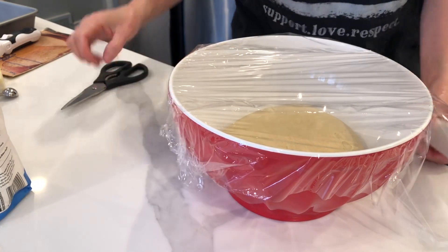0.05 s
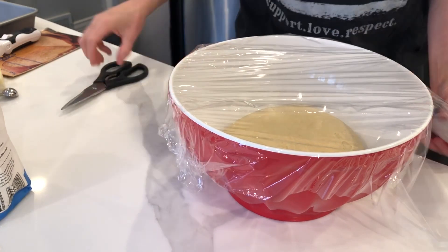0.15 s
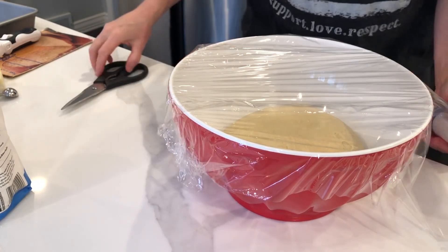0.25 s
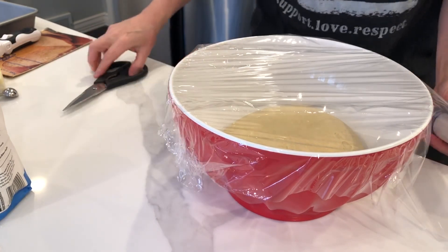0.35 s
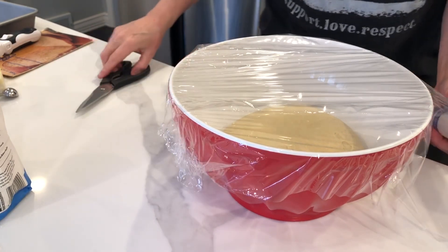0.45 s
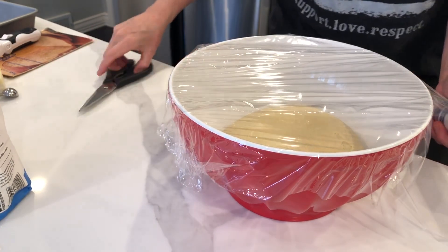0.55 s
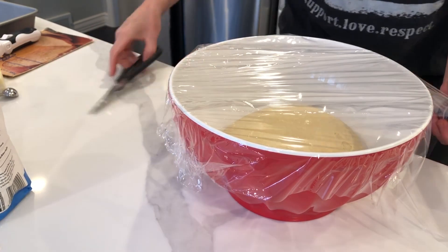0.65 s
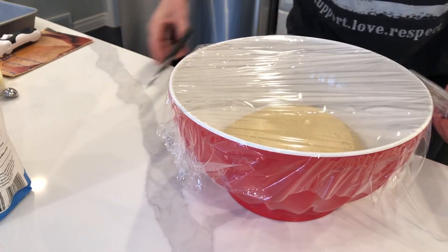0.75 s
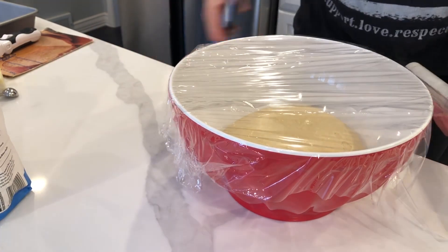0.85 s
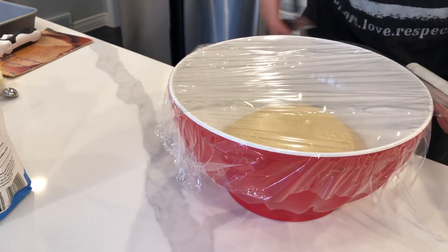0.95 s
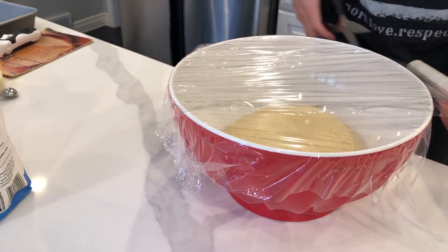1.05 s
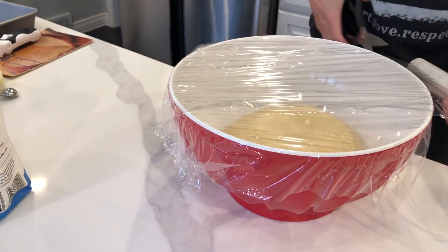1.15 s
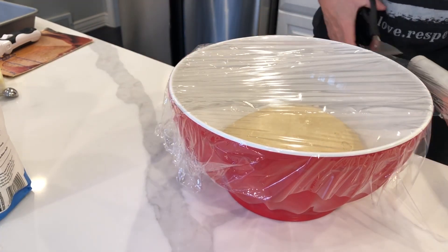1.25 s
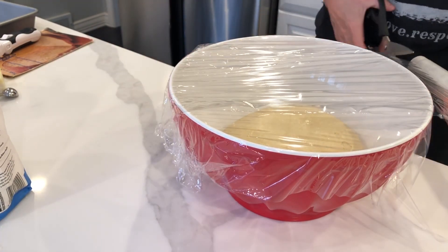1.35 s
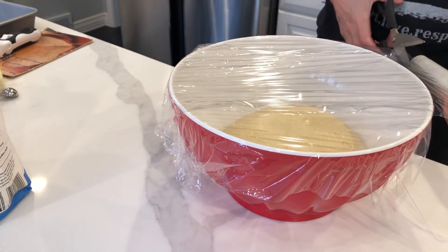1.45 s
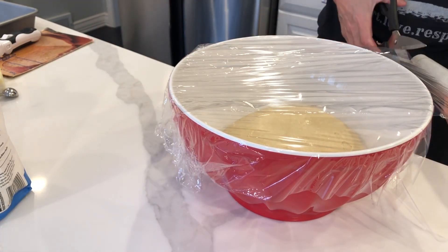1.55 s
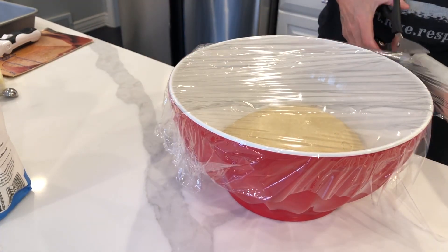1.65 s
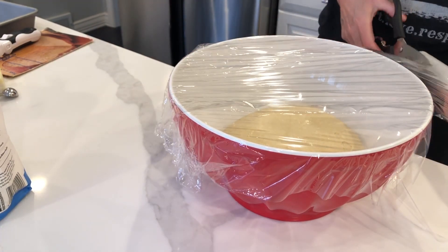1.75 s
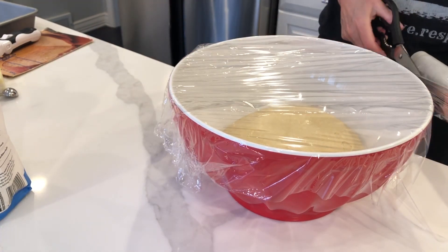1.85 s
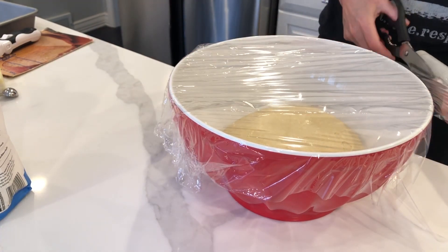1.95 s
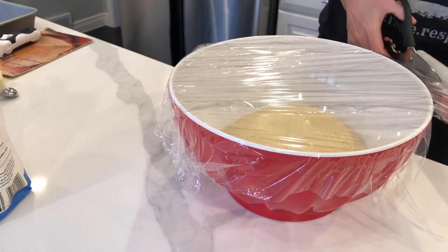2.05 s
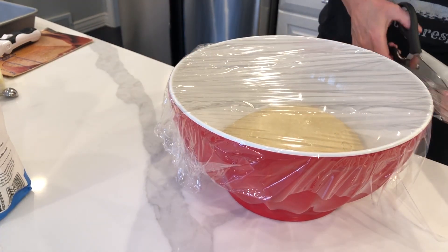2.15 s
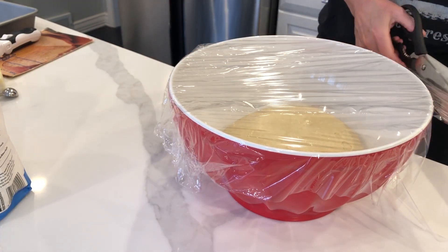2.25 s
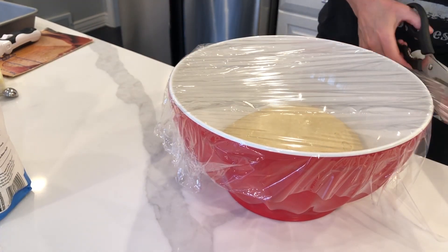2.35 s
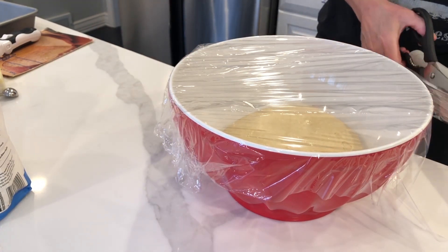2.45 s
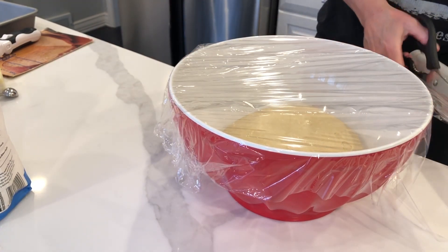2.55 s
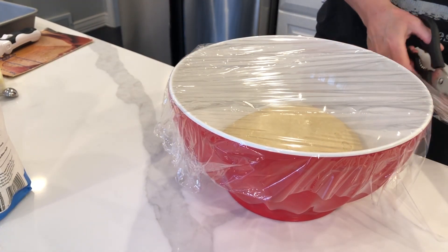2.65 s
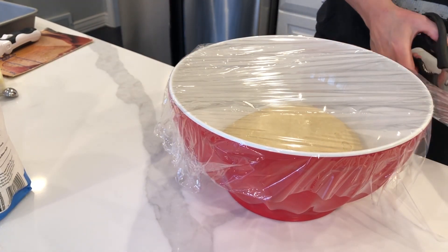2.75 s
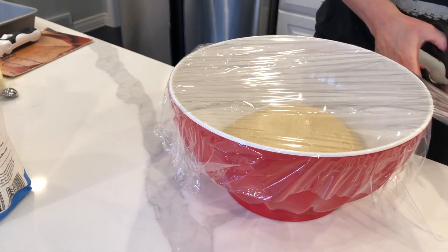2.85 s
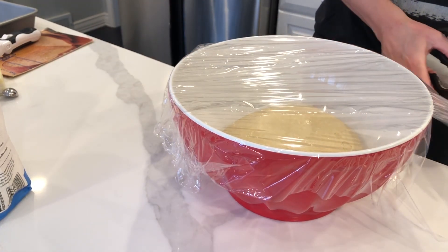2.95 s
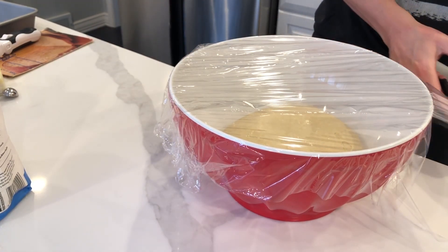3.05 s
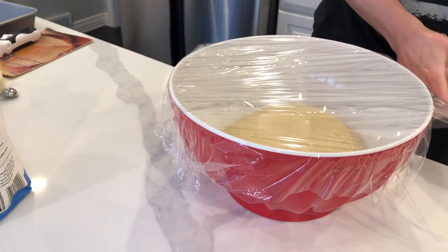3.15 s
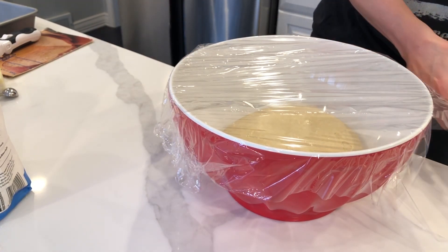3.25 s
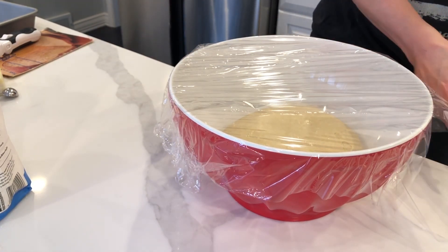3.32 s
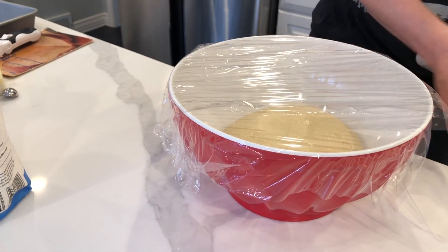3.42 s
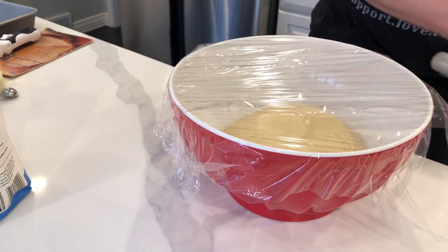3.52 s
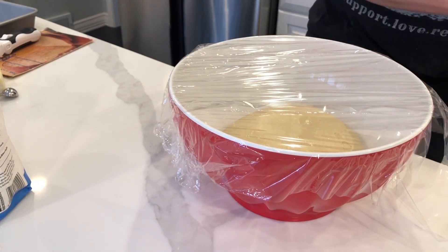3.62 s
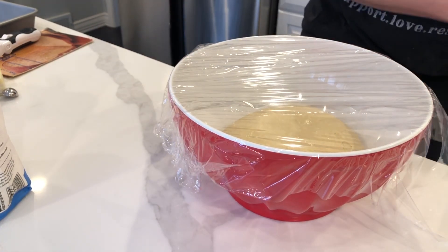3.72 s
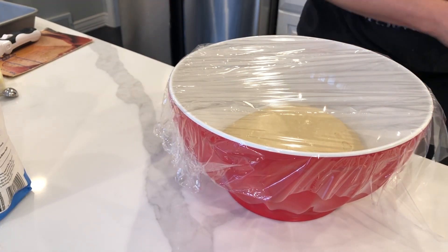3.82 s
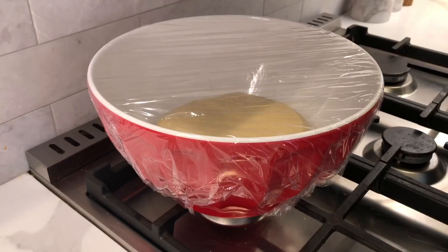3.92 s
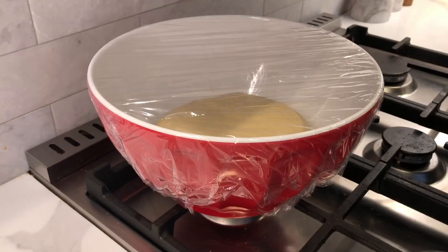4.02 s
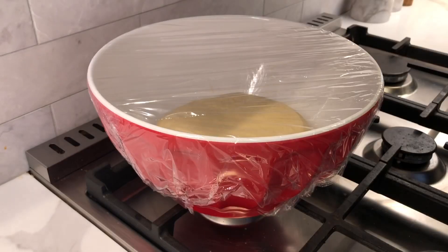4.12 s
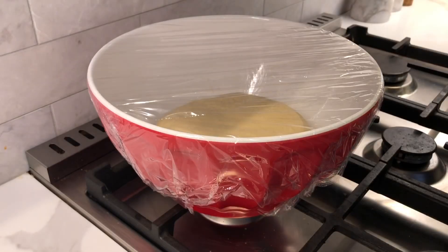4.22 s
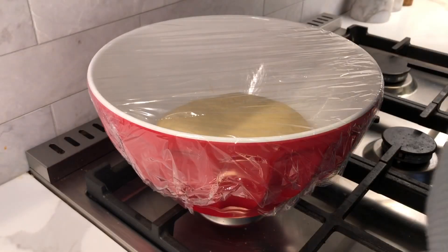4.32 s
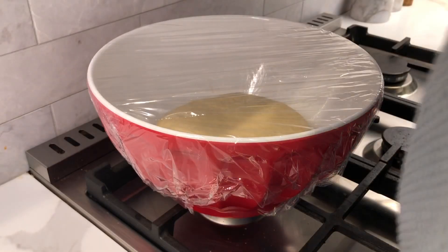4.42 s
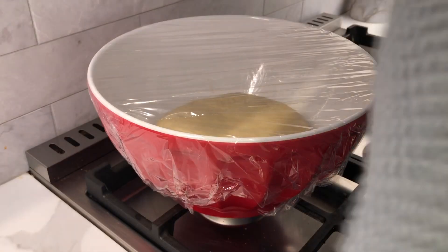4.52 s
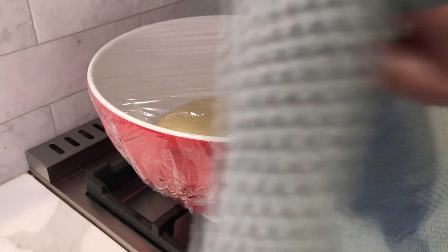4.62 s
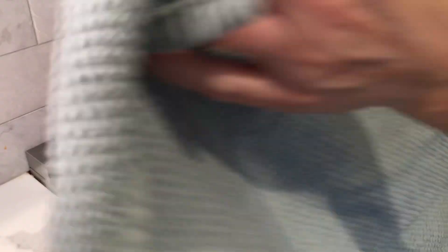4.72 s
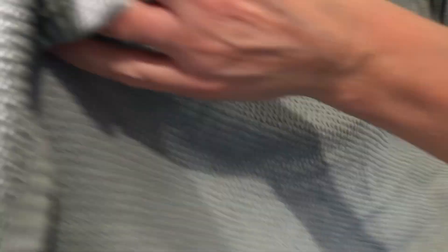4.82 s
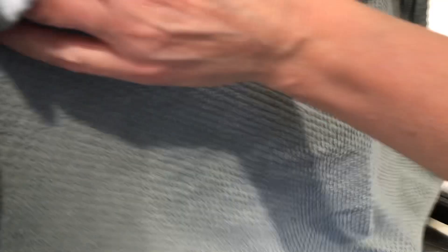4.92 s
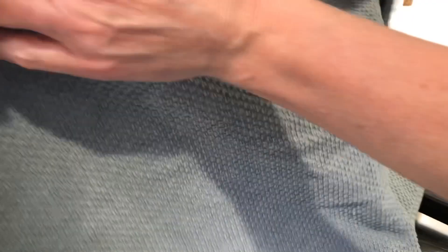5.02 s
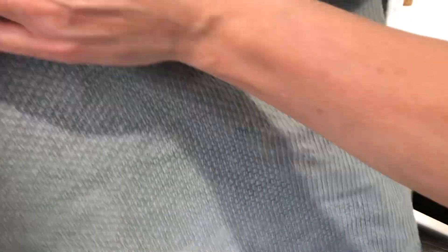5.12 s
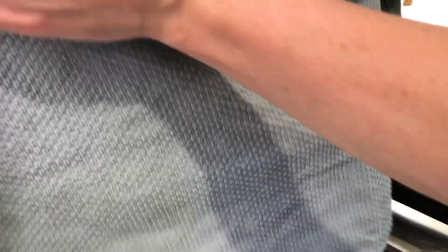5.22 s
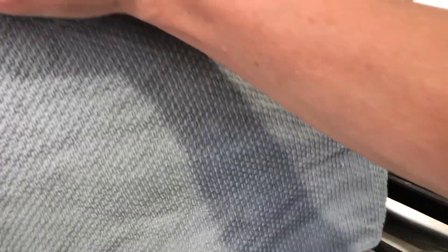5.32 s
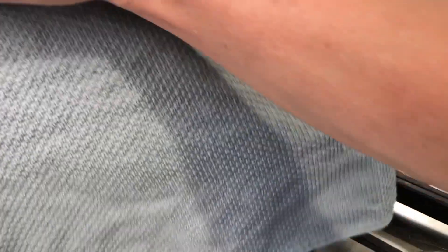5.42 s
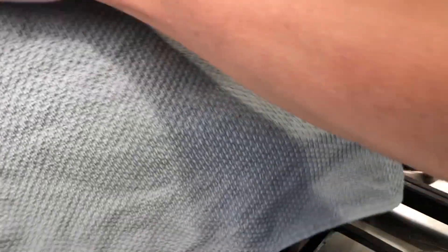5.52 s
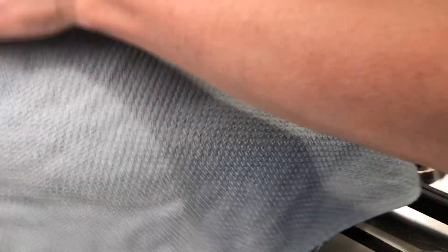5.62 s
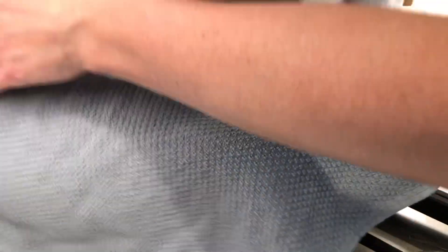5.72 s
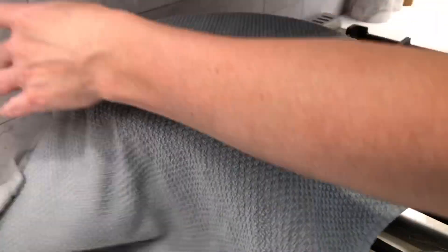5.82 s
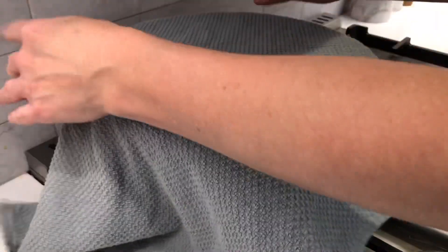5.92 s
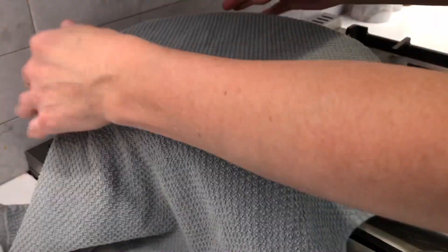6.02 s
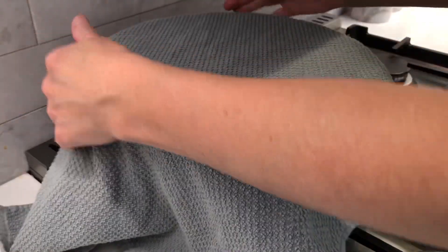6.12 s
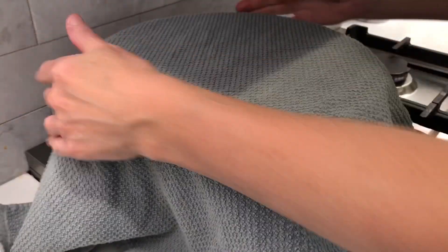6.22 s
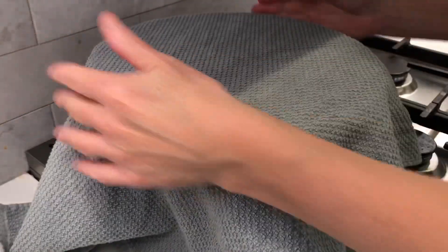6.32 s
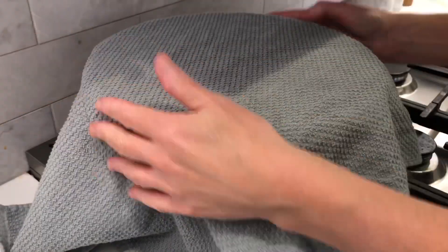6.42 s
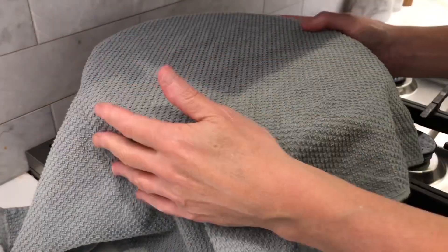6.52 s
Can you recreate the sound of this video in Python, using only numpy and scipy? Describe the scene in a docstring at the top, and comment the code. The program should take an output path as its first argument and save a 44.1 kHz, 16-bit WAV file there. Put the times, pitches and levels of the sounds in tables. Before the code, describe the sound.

Scissors are lifted off a stone counter with a few clicks and a brief steel ring. They snip cling film stretched over a bowl, and the film rustles, pops and snaps, growing louder before it settles. After a tiny dip in level, a towel is drawn over the bowl with a soft hiss and patted down with dull knocks. One microphone picks it up in a hard-walled kitchen with a low hum.

```python
"""A hard-walled kitchen, on one microphone. Scissors are lifted off a stone counter, their steel ringing, and
snip cling film stretched over a bowl; the film snaps and its creases pop and rustle. After a brief dip in level
the scene changes: a bowl stands on a hob, and a towel is drawn over it and patted down with soft hiss and dull
knocks. Further off, the walls answer the clicks over a low room hum; by the hob a deeper hum joins in."""
import sys
import numpy as np
from scipy import signal
from scipy.io import wavfile
from scipy.ndimage import uniform_filter1d

SR = 44100
rng = np.random.default_rng(int(sys.argv[2]) if len(sys.argv) > 2 else 0)


def unload_audio(sound):
    """Save the sound as a 16-bit wav file, at the path given as the first command line argument."""
    columns = np.transpose(np.atleast_2d(sound))
    # keep every value between -1 and 1, then stretch to whole-number steps
    steps = np.round(np.clip(columns, -1, 1) * 32767)
    wavfile.write(sys.argv[1], SR, steps.astype(np.int16))


N = 289472

# Film snaps, blade clicks and flicks; body, treble and room are relative to the level:
# (time [s], level at 1.5-4 kHz [dB], body under 1.5 kHz [dB], treble over 4 kHz [dB], room [dB])
SNAPS = [(0.02, -51, -17, 1, -7), (0.249, -63, 10, 10, 4), (0.3111, -36, 7.5, 17, -2),
         (0.3969, -62, 7, 16, 4), (0.4545, -54, 2, 8, -5), (0.4616, -42, -13, -2, -11),
         (0.4967, -65, 20, 17, -13), (0.611, -38.5, 4, 10.5, 1), (0.66, -38.5, 11, 11.5, -11),
         (1.0581, -51, -7, 14.5, -4.5), (1.2054, -63.5, 4, 13.5, -1), (1.6098, -62, 17.5, 17, 1.5),
         (1.6494, -60.5, -5, 17, -5), (1.6706, -61, 0, 13, -4.5), (1.7198, -57.5, 6, 15.5, 0),
         (1.7699, -65, 8, 14, -4.5), (1.8277, -41, 5, 7, 4.5), (1.9962, -61, 1, 13, -9),
         (2.1368, -49, 6, 13.5, 2.5), (2.1925, -33.5, -2, 7.5, -16), (2.1979, -48, -2, 19.5, 5.5),
         (2.338, -47.5, -12, 12.5, -5), (2.3678, -41, -10, 4.5, 1.5), (2.403, -37.5, 1.5, 5, 2),
         (2.4679, -48, -11, 9.5, 0), (2.5132, -54.5, 6, 22, -6), (2.5483, -50, 9, 12, -4),
         (2.59, -20.5, 1.5, 6.5, -3), (2.5955, -31, 2.5, 5.5, 1.5), (2.7234, -36.5, -6, 3.5, 0.5),
         (2.8649, -34, -18, 10.5, -20), (2.8877, -29, -4, 0, -22), (2.9108, -24.5, -5, 3.5, -7.5),
         (2.924, -27.5, -1.5, -3, 0.5), (2.942, -25.5, -20, 0, -10), (3.0232, -26, -4.5, 3, -3),
         (3.0323, -34, -3, 5.5, -8), (3.0388, -43, -18, 12, -7), (3.0943, -23.5, -4.5, 0, 2.5),
         (3.0994, -19, -24, 2, -7.5), (3.1177, -19.5, -1, -4, -6), (3.1746, -20.5, -4, 0.5, -4.5),
         (3.2324, -27.5, -1, 8, 1.5), (3.2388, -20, -6, 2.5, -10), (3.5681, -53.5, 3, 3, 2),
         (3.6249, -35.5, 0.5, 1.5, -2.5), (4.4766, -48, 9, -16, -4.5), (4.5024, -53.5, 18, -18, -16),
         (4.6139, -30, 2.5, -33, -16), (4.7176, -43, -2, -8, -9), (4.9933, -44, 2, -2, -7),
         (5.4276, -57.5, 9.5, 7, 6), (5.7606, -52.5, 13, 6, -15), (5.8264, -61, 4, 18, -1),
         (5.8768, -36.5, 6, -13, -7), (6.2096, -65, 13, 12, -3.5)]
# Longer scuffs of film, blade or cloth, likewise: (time [s], level [dB], body [dB], treble [dB], room [dB])
SCUFFS = [(0.0852, -57.5, 5, 1, 8), (0.6634, -41.5, 2.5, 6, -2.5), (0.8764, -52, -4, 3.5, 1),
          (1.798, -62, 9.5, 11, -1), (2.1071, -53, 6, 9, -4), (2.137, -66.5, 11, -6, 15.5),
          (2.1923, -45.5, 4, 5.5, 5), (2.8512, -48.5, 5, 0, 7.5), (3.7694, -63.5, 12.5, 2.5, 5),
          (4.809, -60.5, -15, 6.5, 0.5), (6.3278, -39, -0.5, 0, 1.5)]
# Colour of a snap or scuff before its bands are balanced: (frequency [Hz], level [dB])
SNAP_SPECTRUM = [(120, -39.5), (200, 2.5), (925, 1.5), (1280, -6), (2060, -1.5), (2970, -8), (5320, -6),
                 (6870, -8), (11700, -7), (13700, -6), (15600, -5)]
# Its middle, body, treble and top bands: (low edge [Hz], high edge [Hz])
SNAP_BANDS = [(1500, 4000), (300, 1500), (4000, 8000), (8000, 17000)]
# Blows on the scissors, brighter near the tips: (time [s], level [dB], tilt [dB/octave])
STEEL_BLOWS = [(.311, -51.5, 10.5), (.66, -53, -8), (.688, -63, 12.5), (1.058, -72, 9)]
# Modes of the blades: (frequency [Hz], relative level [dB], t60 [s])
STEEL_MODES = [(2250, -10, 0.39), (4830, -2, 0.28), (7940, 2, 0.15), (9650, -3, 0.25), (11400, 2, 0.1),
               (12800, -6, 0.088)]
# Knocks on counter, roll and bowl: (time [s], relative level [dB], pitch [Hz], t60 [s], width [x pitch])
KNOCKS = [(0.101,-50.5,490,0.32,0.57), (0.255,-44,277,0.13,0.15), (0.312,-37.5,535,0.24,0.61),
          (0.612,-37.5,447,0.19,0.34), (0.662,-39.5,703,0.35,0.14), (0.665,-44,208,0.12,0.31),
          (1.83,-52.5,640,0.29,0.24), (2.592,-33.5,930,0.031,0.15), (2.768,-44,684,0.21,0.35),
          (3.104,-45,330,0.32,0.025), (3.12,-41,960,0.13,0.24), (3.177,-46,600,0.073,0.25),
          (3.243,-41,726,0.059,0.85), (3.245,-51,333.7,0.2,0.03), (3.627,-55.5,901,0.24,0.77),
          (3.86,-56.5,1010,0.38,0.85), (3.912,-48.5,1080,0.1,0.62), (3.982,-58,450,0.17,0.55),
          (4.479,-49,895,0.021,1.2), (4.503,-54,900,0.03,0.65), (4.615,-38,593,0.034,1.7),
          (4.808,-43,175,0.054,0.4), (5.0,-54,600,0.11,0.66), (5.138,-55.5,985,0.11,0.075),
          (5.754,-43,129,0.19,0.4), (5.861,-40.5,370,0.25,0.96), (5.873,-35,330,0.12,0.87),
          (5.876,-39,996,0.057,0.28), (6.363,-41.5,377,0.081,0.3), (6.477,-41.5,200,0.047,1.1)]
# Film and cloth on the move: (time [s], rustle level [dB], hand rub level [dB])
HANDLING = [(0.0, -63.5, -64.5), (0.09, -72.5, -76), (0.35, -75.5, -63.5), (0.84, -75, -67.5),
            (1.199, -87, -74.5), (1.55, -75, -69.5), (1.79, -69, -65.5), (2.15, -66.5, -65.5),
            (2.28, -53.5, -55.5), (2.5, -72, -60), (2.68, -58, -61.5), (2.81, -62.5, -60.5),
            (2.92, -50.5, -54.5), (3.32, -59, -64), (3.42, -72, -71), (3.65, -78, -81),
            (3.84, -68.5, -63.5), (3.98, -72, -65.5), (4.73, -73, -67), (5.04, -65, -63.5),
            (5.46, -70, -70.5), (5.8, -66.5, -61), (6.16, -88.5, -74), (6.5, -66, -66)]
# Colour of the rustle: (frequency [Hz], level [dB])
RUSTLE_SPECTRUM = [(710, -38), (1200, -13), (1290, -15.5), (2060, -9), (3140, -8.5), (4700, -3),
                   (9000, -13), (11700, -33), (19800, -120)]
# Extra rustle above 9 kHz: (time [s], relative level [dB])
RUSTLE_AIR = [(0.0, 0.5), (0.5, 0), (1.3, -3), (1.8, 10), (2.3, -5), (3.1, 2), (3.5, -3), (4.5, -0.5),
              (5.4, 2.5), (6.5, 0.5)]
# Colour of rubbing palms: (frequency [Hz], level [dB])
RUB_SPECTRUM = [(120, -27.5), (200, -18.5), (447, -4), (680, -3.5), (744, -11), (824, -7.5), (1030, -12.5),
                (3000, -20), (3900, -31.5), (6600, -120)]
# Decay of the kitchen: (frequency [Hz], t60 [s])
KITCHEN_DECAY = [(250, 0.26), (660, 0.57), (1740, 0.39), (4590, 0.36), (12100, 0.25), (15500, 0.24)]
# Colour of the room tone: (frequency [Hz], level [dB])
HUM_SPECTRUM = [(15, -60), (25, -5.5), (126, -4.5), (189, -3), (254, -17), (299, -11.5), (380, -22.5),
                (435, -12.5), (570, -37), (688, -29), (15700, -36.5)]

CUTTING_S, HOB_S = 1.3, 3.951  # the snipping starts; the scene changes to the hob


def snaps_and_scuffs():
    """Taut film lets go and blades click in short snaps; sliding surfaces give longer, rougher scuffs."""
    snaps = bursts(SNAPS, decay_ms=1.3, rise_ms=.15, top_db=3, grain_db=2.5)
    scuffs = bursts(SCUFFS, decay_ms=14, rise_ms=1.5, top_db=2.5, grain_db=4.5)
    return snaps + scuffs


def bursts(rows, decay_ms, rise_ms, top_db, grain_db):
    """Decaying noise bursts, each with its own colour, reach the microphone direct and off the walls."""
    direct, to_walls = np.zeros(N), np.zeros((2, len(SNAP_BANDS), N))
    ms = np.arange(4000) * 1000 / SR
    shape = .5 * np.exp(-ms / decay_ms) * (1 - np.exp(-ms / rise_ms))
    click = colour(signal.unit_impulse(1024), SNAP_SPECTRUM)
    click_bands = [band(click, *edges) for edges in SNAP_BANDS]
    noise = rng.standard_normal((len(rows), len(SNAP_BANDS), len(ms)))
    # slips: the level jumps about every millisecond, in all bands at once
    noise *= gain_of(grain_db * np.repeat(rng.standard_normal((len(rows), 1, 100)), 40, axis=2))
    for k, (s, db, body_db, treble_db, room_db) in enumerate(rows):
        dull_db = -2 if s < CUTTING_S else 0  # steel on stone has less top octave
        band_db = db + np.array([0, body_db, treble_db, treble_db + top_db + dull_db])
        strengths = np.linalg.norm(shape) * gain_of(band_db)
        for b, (part, strength) in enumerate(zip(click_bands, strengths)):
            burst = signal.oaconvolve(shape * noise[k, b], part)
            add(direct, s, strength * burst / np.linalg.norm(burst))
            # the walls hear the film from all sides, so only its broad colour reaches them
            sent = gain_of(room_db) * strength * part / np.linalg.norm(part)
            add(to_walls[k % 2, b], s + decay_ms / 2000, sent)  # two paths alternate
    return direct + sum(kitchen(path) for path in to_walls.reshape(-1, N))


def scissors():
    """The loose blades rattle: the same steel modes ring, blurred, at every blow."""
    out, t = np.zeros(N), np.arange(SR // 2) / SR
    for s, db, tilt_db in STEEL_BLOWS:
        noise = rng.standard_normal(len(t))
        for hz, mode_db, t60 in STEEL_MODES:
            level_db = db + mode_db + tilt_db * np.log2(hz / 5000) - 60 * t / t60
            add(out, s, gain_of(level_db) * blurred_ring(hz, .07 * hz, noise))
    return out


def knocks():
    """A soft blow on counter, roll or bowl rings a crowd of damped low modes around its pitch."""
    out, t = np.zeros(N), np.arange(SR // 2) / SR
    attack = 1 - np.exp(-t / 0.00086)
    for s, db, hz, t60, width in KNOCKS:
        shape = attack * gain_of(-60 * (t / t60) ** 1.266)  # a hand stifles the end
        ring = blurred_ring(hz, width * hz, rng.standard_normal(len(t))) * shape
        add(out, s, 0.64 * gain_of(db) * ring * np.linalg.norm(shape) / np.linalg.norm(ring))
    return out


def handling():
    """Film and towel rustle, palms rub, and the movement stirs the air."""
    t = np.arange(N) / SR
    times, *levels = np.transpose(HANDLING)
    rustle_db, rub_db = (np.interp(t, times, level) for level in levels)
    air_db = np.interp(t, *np.transpose(RUSTLE_AIR))
    clicks_db = np.where(t < HOB_S, -1, -7.5)  # film pops, cloth mostly hisses
    pops = patchy(crackle(per_s=600, clicks_db=clicks_db), depth_db=2.0)
    air = gain_of(air_db) * unit_rms(band(pops, 9000, 18000))
    rustle = unit_rms(colour(pops, RUSTLE_SPECTRUM)) + air
    rub = patchy(colour(crackle(per_s=790, clicks_db=-5.5), RUB_SPECTRUM), depth_db=2.5)
    stir = unit_rms(band(rng.standard_normal(N), 65, 339))
    stir_db = -62.5 + .45 * (rub_db + 65)  # swells with the rub
    return (rustle + creases()) * gain_of(rustle_db) + rub * gain_of(rub_db) + stir * gain_of(stir_db)


def creases(per_s=110, decay_ms=.14):
    """Single creases pop out of the rustle, each at its own pitch, and the walls answer."""
    size_db = 18 + 3.5 * np.minimum(rng.exponential(1, N), 3)
    kicks = gain_of(size_db) * (rng.random(N) < per_s / SR)
    pitches_hz, t = np.linspace(4500, 15500, 12), np.arange(256) / SR
    pitch_index = rng.integers(0, len(pitches_hz), N)
    age = t * 1000 / decay_ms
    pops = [np.sin(2 * np.pi * hz * t) * np.sqrt(age) * np.exp(-age) for hz in pitches_hz]
    direct = sum(signal.oaconvolve(kicks * (pitch_index == k), pop)[:N] for k, pop in enumerate(pops))
    return direct + gain_of(-5.0) * kitchen(direct)


def crackle(per_s, clicks_db):
    """Tiny clicks of uneven size, their level set against a smooth hiss."""
    size = gain_of(3 * np.minimum(rng.exponential(1, N), 4)) * rng.choice([-1., 1.], N)
    clicks = unit_rms(size * (rng.random(N) < per_s / SR))
    share = gain_of(clicks_db)
    return (share * clicks + rng.standard_normal(N)) / np.sqrt(1 + share ** 2)


def kitchen(x):
    """The hard walls send back sparse reflections of random sign, each band dying at its own speed."""
    taps = np.zeros(SR // 2)
    slots = np.arange(120, len(taps) - 12, 12)
    taps[slots + rng.integers(0, 12, len(slots))] = rng.choice([-1., 1.], len(slots))
    hz, t, spectrum = signal.stft(taps, SR, nperseg=128)
    decay = gain_of(-60 * t / value_at(KITCHEN_DECAY, hz)[:, None])
    tail = signal.istft(spectrum * decay, SR, nperseg=128)[1]
    return signal.fftconvolve(x, tail / np.linalg.norm(tail))[:N]


def room_hum(room_db=-67, hob_db=-62.5):
    """Low room tone throughout, and a deeper, wavering hum with the microphone near the hob."""
    room = unit_rms(colour(rng.standard_normal(N), HUM_SPECTRUM))
    hob = patchy(blurred_ring(hz=93.4, width_hz=70, noise=rng.standard_normal(N)), depth_db=4.5)
    return gain_of(room_db) * room + gain_of(hob_db) * hob * (np.arange(N) / SR > HOB_S)


def blurred_ring(hz, width_hz, noise):
    """Noise through a steep resonance: a ring too damped and crowded to be a clean tone."""
    radius = np.exp(-np.pi * width_hz / SR)
    section = [1, 0, -1, 1, -2 * radius * np.cos(2 * np.pi * hz / SR), radius ** 2]
    return unit_rms(signal.sosfilt([section, section], noise))


def patchy(x, depth_db):
    """The level wanders in patches of time and pitch, as when folds come and go."""
    spectrum = signal.stft(x, nperseg=256)[2]
    patches = uniform_filter1d(rng.standard_normal(spectrum.shape), size=14, axis=0)
    patches = unit_rms(uniform_filter1d(patches, size=9, axis=1))
    return unit_rms(signal.istft(spectrum * gain_of(depth_db * patches), nperseg=256)[1][:N])


def colour(x, spectrum):
    """Minimum-phase filter with the given spectrum."""
    hz = abs(np.fft.fftfreq(4096, 1 / SR))
    log_gain = np.log(gain_of(np.maximum(value_at(spectrum, hz), -100)))
    taps = np.fft.ifft(np.exp(np.conj(signal.hilbert(log_gain)))).real[:2048]
    return signal.oaconvolve(x, taps)[:len(x)]


def band(x, low_hz, high_hz):
    """Second-order band-pass."""
    return signal.sosfilt(signal.butter(2, [low_hz, high_hz], "band", fs=SR, output="sos"), x)


def value_at(table, hz):
    """Interpolates a table over log frequency."""
    table_hz, values = np.transpose(table)
    return np.interp(np.log(hz + 1), np.log(table_hz + 1), values)


def gain_of(db):
    """dB to amplitude."""
    return 10 ** (np.asarray(db) / 20)


def unit_rms(x):
    """Scales to rms 1."""
    return x / np.sqrt(np.mean(x ** 2) + 1e-20)


def add(mix, s, sound):
    """Mixes a sound in at second s."""
    part = mix[round(s * SR):][:len(sound)]
    part += sound[:len(part)]


def scene():
    """The work at the bowl, the walls' answer and the hum behind it, in mono."""
    struck = knocks() + scissors()
    film = snaps_and_scuffs()
    background = room_hum() + gain_of(-10.5) * kitchen(struck)
    return (film + struck + handling() + background)[None]


def record(dry):
    """The microphone loses deep bass; the level dips briefly where the scene changes; the top ends at 15.9 kHz."""
    low_cut = signal.sosfilt(signal.butter(2, 36, "high", fs=SR, output="sos"), dry)
    dip = np.clip(abs(np.arange(N) / SR - HOB_S) / .016, .08, 1) ** 1.08  # 16 ms either side
    low_pass = signal.firwin(511, 15900, window=("kaiser", 9), fs=SR)
    return signal.oaconvolve(low_cut * dip, low_pass[None], "same")


dry = scene()
out = record(dry)
unload_audio(out)
```